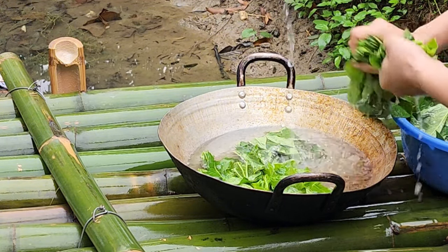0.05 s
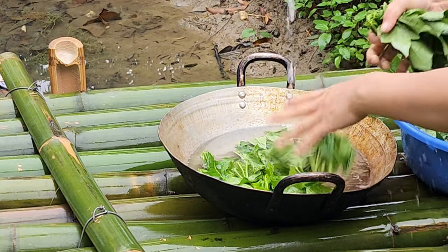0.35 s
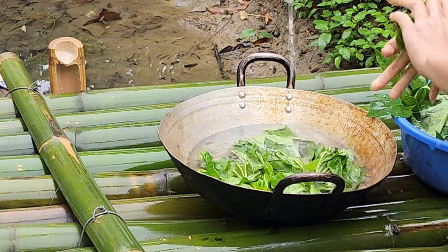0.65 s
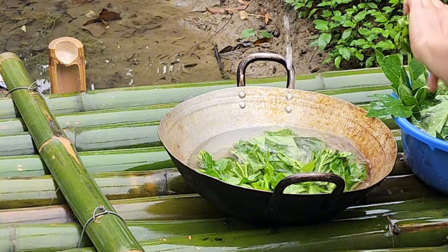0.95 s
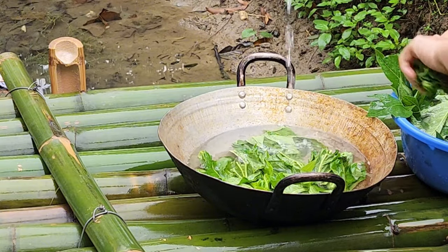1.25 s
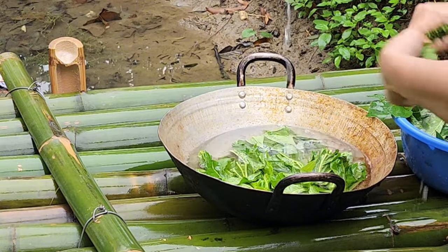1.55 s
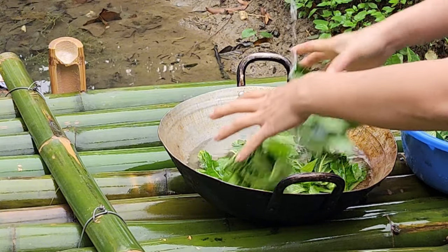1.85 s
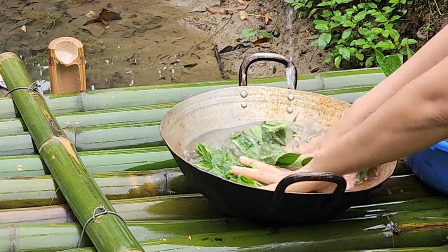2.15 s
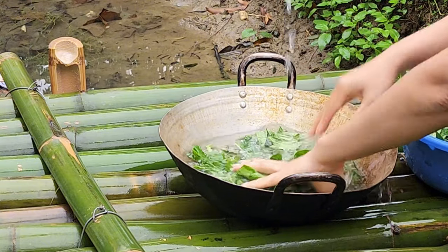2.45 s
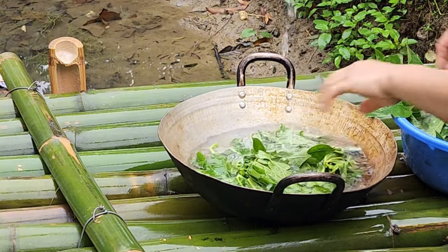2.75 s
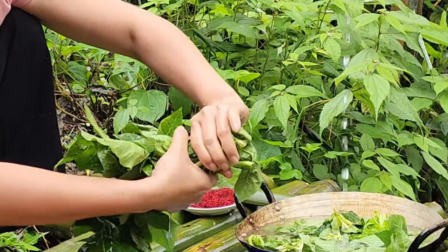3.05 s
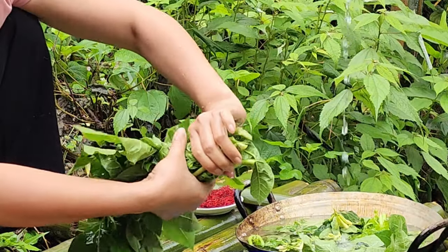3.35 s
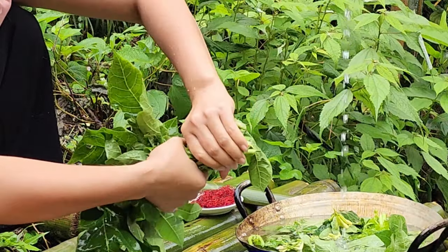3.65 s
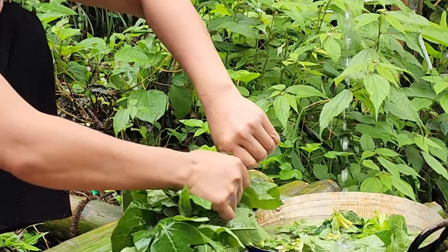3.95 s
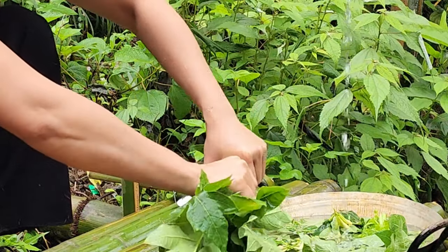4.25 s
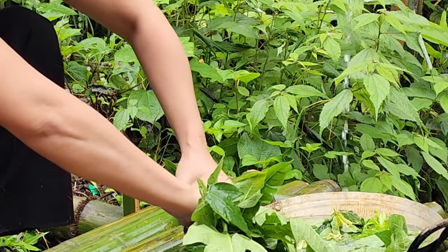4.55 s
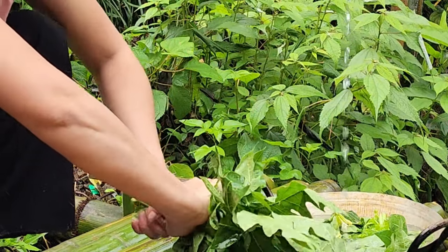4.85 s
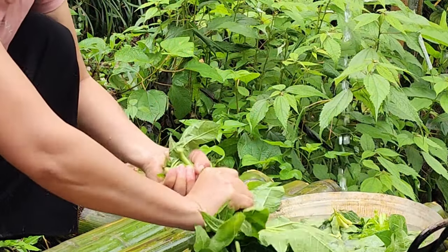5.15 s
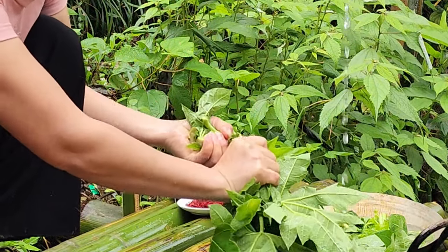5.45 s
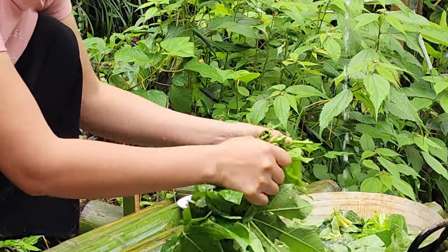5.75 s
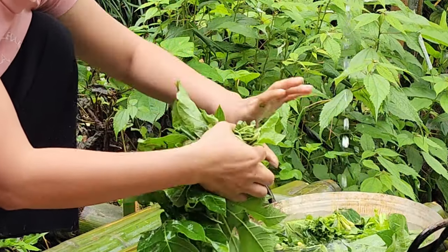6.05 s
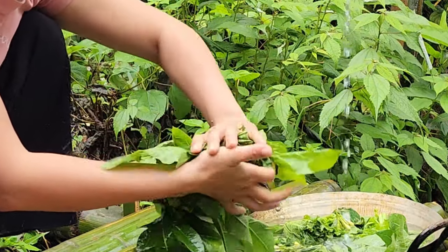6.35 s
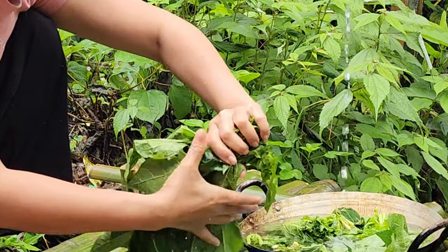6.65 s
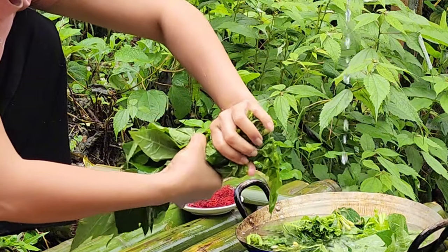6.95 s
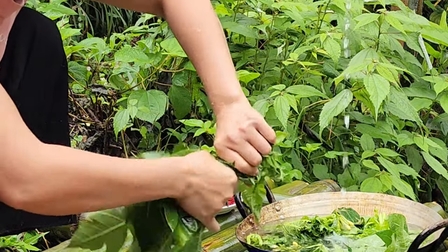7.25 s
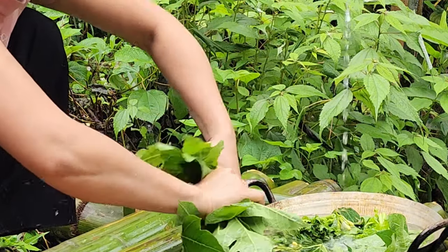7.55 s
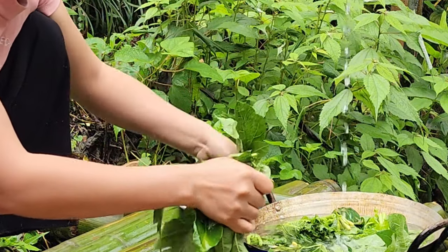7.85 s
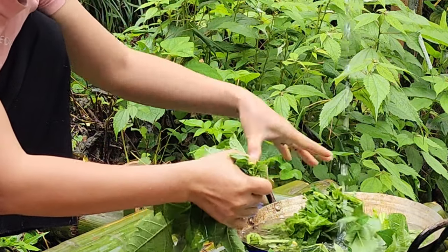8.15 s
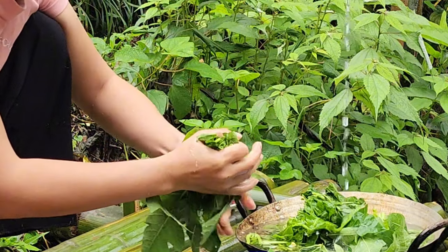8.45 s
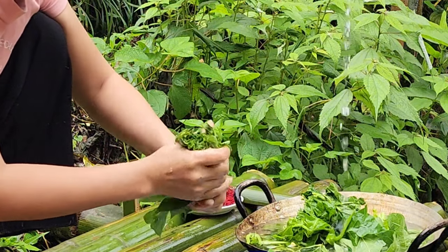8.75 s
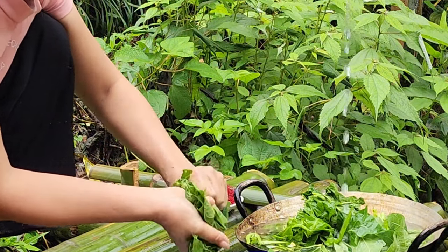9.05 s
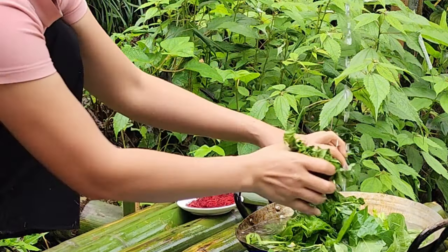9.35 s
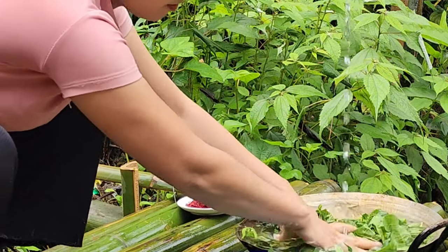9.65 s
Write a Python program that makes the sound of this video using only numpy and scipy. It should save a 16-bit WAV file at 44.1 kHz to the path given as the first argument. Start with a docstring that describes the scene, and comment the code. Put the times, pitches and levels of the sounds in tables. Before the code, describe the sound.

Greens are washed by hand outdoors, heard from close beside a wok of water. A steady trickle spatters, plops and bubbles, its gurgle muffled at times by hands and heaped leaves. Bursts of wet rustling and sharp stalk snaps follow, strongest around the middle and again near the end, with a few dull bumps. Far off, a bird repeats a thin whistled phrase over quiet open air.

```python
"""Washing greens in a wok

Outdoors, leafy greens are twisted apart by hand and pushed into a wok of water. A thin stream falls
from a spout: its drops spatter, and the air it traps plops and gurgles, except when hands or heaped
leaves muffle it. Wet leaves crackle, stalks snap, drips ring; a far bird whistles over a low rumble."""
import sys
import numpy as np
from scipy import signal
from scipy.fft import rfft, irfft
from scipy.io import wavfile
from scipy.ndimage import uniform_filter1d

SR = 44100
rng = np.random.default_rng(int(sys.argv[2]) if len(sys.argv) > 2 else 0)


def unload_wav(signal):
    """Save mono or channel-first audio to the path in sys.argv[1] as 16-bit WAV at rate SR, clipped to [-1, 1]."""
    wavfile.write(
        sys.argv[1],
        SR,
        np.round(np.clip(np.atleast_2d(signal).T, -1, 1) * 32767).astype(np.int16),
    )


N = 432180
TIME = np.arange(N) / SR

# The stream, muffled while hands or heaped leaves lie under it:
# t/s, relative gurgle level/dB, air pocket f/Hz, relative spray level/dB
STREAM_FLOW = [(0, -40.5, 590, -44), (.5, -52, 896.4, -45), (.95, -52.5, 842, -43.5),
               (1.5, -69, 839.3, -43), (1.82, -44.5, 748, -46), (1.93, -63, 839.4, -51),
               (2.94, -76, 789.4, -51), (3.02, -50, 576, -45), (4.4, -48.5, 567.9, -44.5),
               (5.75, -46.5, 573, -47), (7.3, -46.5, 558.9, -43), (8.08, -51.5, 541.8, -46),
               (8.11, -58, 564.8, -58), (9.58, -62.5, 567.5, -54), (9.8, -51, 565, -43)]


def stream(per_s=145, spread_db=4.8, level_db=-1.5, scatter=0.12):
    """Gurgling: each bead of falling water traps a ringing pocket of air of slightly different size."""
    # The tones of one pocket: multiple of its pitch, decay/s, relative level/dB
    pocket_tones = [(1.001, 0.0067, 10), (1.35, 0.003, -0.5), (2.35, 0.0052, 2.5)]
    db, hz, _ = curves(STREAM_FLOW)
    at, strength = random_hits(per_s, spread_db)
    gurgle = np.zeros((2, N))
    for multiple, decay_s, tone_db in pocket_tones:
        pitch = hz[at] * multiple * np.exp(rng.normal(0, scatter / multiple, len(at)))
        gain = strength * amp(tone_db + rng.normal(0, 3.0, len(at)))
        gurgle += rings(at, gain, pitch, np.full(len(at), decay_s), rise=0.025, size=900)
    return steadied(gurgle, 0.25) * amp(db + level_db)


def plops(decay=0.0038, attack=0.0026, glide_per_s=16, overtone_db=-13, splash_db=-7, level_db=-7):
    """A splash traps air that rings briefly and creeps up in pitch; small pockets plink and die sooner."""
    # Trapped air, from low gulps to high plinks: t/s, relative level/dB, f/Hz
    pockets = [(.208, -33, 601), (.242, -30, 720), (.299, -35, 3330), (.632, -43.5, 815),
               (.8183, -43, 3300), (.858, -40.5, 849), (1.0868, -27.5, 2350), (1.208, -29.5, 614),
               (1.657, -39, 994), (1.796, -35.5, 668), (2.2996, -33.5, 3346), (3.335, -39.5, 497),
               (3.515, -37.5, 569), (3.694, -35.5, 596), (3.749, -34.5, 559.3), (3.976, -37.5, 564.6),
               (4.207, -31.5, 577), (4.463, -32.5, 447.5), (4.841, -38, 1007), (5.024, -35, 590),
               (5.256, -38.5, 578.8), (5.443, -34.5, 566), (5.559, -40, 558), (6.204, -33, 475),
               (6.802, -39, 540), (7.01, -35.5, 534), (7.249, -35, 575), (7.295, -37, 560.6),
               (7.466, -33, 603), (7.935, -40, 552), (7.994, -40.5, 537)]
    out, t = np.zeros((2, N)), np.arange(2200) / SR
    for s, db, hz in pockets:
        phase = 2 * np.pi * hz * (t + glide_per_s * t * t / 2)
        age = t * (hz / 600) ** 0.65  # runs faster for higher notes
        fade = np.exp(-age / decay)
        tone = np.sin(phase) + amp(overtone_db) * np.sin(2.27 * phase) * fade
        ring = evened(tone * (1 - np.exp(-age / attack)) * fade)
        burst = noise_pair(len(t)) * np.exp(-age / 0.0032)
        splash = evened(colour(burst, [(hz / 2, -14), (hz, 0), (hz * 2, -4), (hz * 10, -18)]))
        add(out, s, amp(db + level_db) * (ring + amp(splash_db) * splash))
    return out


def crackle(db, treble_db, drop_share, clump_db=2.0, level_db=1.22, usual_treble_db=-7):
    """Spatter and rustle come in clumps as the hands grip and twist."""
    drift = uniform_filter1d(uniform_filter1d(rng.standard_normal(N), size=500), size=200)
    blend = np.sqrt(drop_share) * spatter(db) + np.sqrt(1 - drop_share) * rustle()
    wet = steadied(blend * amp(clump_db * evened(drift)), 0.16)
    wet = turn_treble(wet, treble_db - usual_treble_db, above_hz=7800)
    return wet * amp(db + level_db) * lean_right(0.7)


def spray_and_grips(spray_treble_db=-6, spray_drop_share=0.92, attack_s=0.015, release_s=0.025):
    """Spray and handled leaves add up; gives their joint level/dB, treble/dB and share of drops."""
    # Handfuls of leaves gripped, torn, squeezed or pressed under:
    # t/s, length/s, relative level/dB, relative treble/dB, share of drops (0-1)
    grips = [(.22, 0.14, -41, -15, 0.95), (0.931, 0.071, -43, -18.5, 0.79), (1.171, 0.14, -40.5, -24, 0.84),
             (1.32, 0.051, -35.5, -8.5, 0.54), (1.858, 0.048, -42.5, -17, 0.81),
             (2.07, 0.047, -44, -15, 0.69), (2.268, 0.27, -46, -12, 0.9), (2.55, 0.053, -46, -12, 0.6),
             (2.71, 0.076, -48, -3, 0.99), (3.08, 0.057, -45, -5, 0.5), (3.579, 0.57, -41.5, -15, 0.25),
             (3.8, 0.061, -38, -18, 0.25), (4.319, 0.061, -38, -13, 0.34), (4.451, 0.07, -40, -28, 0.3),
             (4.679, 0.051, -41, -26, 0.4), (4.859, 0.14, -37.5, -27, 0.27), (5.14, 0.035, -39, -28, 0.27),
             (5.47, 0.03, -41.5, -22, 0.44), (5.867, 0.046, -45, 1, 0.4), (6.44, 0.09, -47, -7, 0.3),
             (6.981, 0.15, -44, -18, 0.19), (7.158, 0.44, -36.5, -6.5, 0.22), (8.19, .32, -51, -8, .08),
             (8.285, .09, -48, -5, 0.15), (8.53, 0.27, -45.5, -9, 0.36), (8.818, .1, -43, -4.5, 0.31),
             (8.92, 0.076, -33.5, -7, 0.49), (9.231, 0.2, -48.5, -6, 0.8)]
    power = amp(curves(STREAM_FLOW)[2]) ** 2
    treble, drops = power * amp(spray_treble_db) ** 2, power * spray_drop_share
    for start, length, db, treble_db, share in grips:
        age = TIME - start
        fade_in = np.clip(age / attack_s, 0, 1)
        fade_out = np.exp(-np.clip(age - length, 0, 1) / release_s)
        grip = (amp(db) * fade_in * fade_out) ** 2
        power += grip
        treble += grip * amp(treble_db) ** 2
        drops += grip * share
    return 10 * np.log10(power), 10 * np.log10(treble / power), np.clip(drops / power, 0, 1)


def spatter(db, usual_per_s=380, spread_db=5.2, scatter=0.24, tick_s=0.00048, tick_db=-6):
    """Droplets and bursting films of water: each is a sharp tick and a quick cluster of short rings."""
    # The tone colour of drops on leaves: f/Hz, relative level/dB
    spectrum = [(150, -33), (250, -22), (452, -25), (576, 2), (1050, -3), (1330, -4), (1750, -10.5),
                (2250, -.5), (2700, -5), (3300, -2), (4490, -7.5), (5250, -4.5), (7440, -4.5), (9010, -9.5),
                (14900, -10), (16000, -10.5)]
    # a harder splash throws more drops, so they merge
    at, strength = random_hits(usual_per_s * amp(0.8 * (db - db.mean())), spread_db)
    centre_hz = np.exp(rng.uniform(np.log(900), np.log(15000), len(at)))
    ticks = evened(noise_pair(N) * np.sqrt(hit_power(at, strength, tick_s)))
    # the finest drops differ least in strength
    strength = strength ** np.minimum((6000 / centre_hz) ** 0.49, 1)
    ringing = np.zeros((2, N))
    for delay in np.linspace(0, 0.0024, num=4):
        hz = np.minimum(centre_hz * np.exp(rng.normal(0, scatter, len(at))), SR / 2)
        late = (delay * SR * rng.uniform(0, 2, len(at))).astype(int)
        gain = strength * (hz / 3000) ** 0.68 * np.exp(-delay / 0.005)
        ringing += rings(at + late, gain, hz, decay_s=0.0017 * (hz / 3000) ** -0.5, rise=0, size=300)
    return steadied(colour(evened(ringing) + amp(tick_db) * ticks, spectrum), 0.087)


def rustle(per_s=700, spread_db=4.0, break_s=0.0007, hiss=0.39):
    """Wet leaves rub and tear: a dense run of tiny breaks over a soft hiss."""
    # The tone colour of rubbing leaves: f/Hz, relative level/dB
    spectrum = [(150, -7.5), (430, -6.5), (580, 1), (900, -11), (1350, 2.5), (1700, -1), (2230, 7),
                (2700, -0.5), (3300, 4), (4000, -1), (4500, -0.5), (5300, 3), (9500, -4), (16000, -9)]
    at, strength = random_hits(per_s, spread_db)
    power = hit_power(at, strength, break_s)
    tearing = noise_pair(N) * np.sqrt(power / power.mean() + hiss)
    return steadied(colour(tearing, spectrum), 0.0096)


def snaps(lesser_snaps, crack_s=0.0023, crack_db=-4.5, crack_per_octave_db=8, level_db=-5):
    """A stalk gives way in an instant: thick ones pop for a few cycles, thin ones only crack."""
    # The loudest stalks snapping and hard drops smacking: t/s, relative level/dB, rough f/Hz
    loud_snaps = [(.0386, -28.5, 4200), (.1594, -29.5, 5500), (.2095, -32.5, 6017), (.35, -32, 2730),
                  (.546, -35.5, 3300), (.608, -39, 2300), (.7158, -34, 5450), (.8185, -37, 3396),
                  (.896, -39, 4460), (.992, -30.5, 5870), (1.087, -33, 2330), (1.178, -33.5, 3336),
                  (1.316, -29, 2150), (1.5339, -30, 3180), (1.5448, -28.5, 3553), (1.597, -30.5, 4950),
                  (1.631, -32.5, 4775), (1.8375, -34.5, 4194), (2.366, -39.5, 6500), (2.4425, -31.5, 5510),
                  (2.5185, -29.5, 9500), (2.579, -35.5, 2122), (2.773, -39.5, 2960), (2.8192, -34.5, 3520),
                  (2.8535, -34.5, 6712), (2.9776, -35, 4134), (3.629, -34, 6740), (4.2237, -30, 3288),
                  (4.291, -26, 2560), (4.3569, -26.5, 2483), (4.5192, -29, 3620), (4.7095, -28.5, 4234),
                  (4.868, -37.5, 4833), (4.963, -33.5, 3400), (4.9875, -23, 1693), (4.9902, -33.5, 1500),
                  (5.1342, -19.5, 2053), (5.1522, -29, 2936), (5.4728, -26, 2637), (5.4758, -28.5, 2503),
                  (5.764, -38, 3270), (5.902, -35.5, 4196), (6.091, -35, 7474), (6.4455, -35.5, 6444),
                  (6.5292, -29.5, 6600), (6.59, -38, 5005), (6.722, -34.5, 4078), (6.749, -31.5, 5650),
                  (6.8383, -33.5, 5777), (6.9955, -34.5, 7510), (7.1803, -28, 3433), (7.3694, -26, 4177),
                  (7.4185, -27, 4700), (7.4349, -28, 3208), (7.5755, -18, 3770), (7.848, -37.5, 3498),
                  (7.8975, -35.5, 6500), (8.045, -37.5, 3286), (8.348, -38.5, 5500), (8.5482, -34.5, 3403),
                  (8.826, -32, 5927), (8.9265, -25.5, 2500), (8.95, -38, 2182), (8.972, -35, 2000),
                  (8.9997, -28.5, 7030), (9.2258, -39, 2590), (9.233, -37, 7030)]
    out, t = np.zeros((2, N)), np.arange(880) / SR
    for s, db, hz in loud_snaps + lesser_snaps:
        pop = evened(np.sin(2 * np.pi * hz * 0.884 * t) * np.exp(-t * hz / 1.34))
        fibres = noise_pair(len(t)) * (np.exp(-t / crack_s) + 0.072 * np.exp(-t / 0.0031))
        spectrum = [(200, -24), (hz * 0.33, -10), (hz * 0.62, 0), (hz * 1.64, -3), (hz * 3, -17)]
        crack = evened(colour(fibres, spectrum)) * amp(crack_db + crack_per_octave_db * np.log2(hz / 2000))
        snap = evened((pop + crack) * (1 - np.exp(-t / 0.0002)))
        add(out, s, snap * amp(db + level_db) * lean_right(0.4))
    return out


def small_snaps(db, drop_share, most_per_s=18, above_db=2.5, spread_db=0.4, middle_hz=4600, scatter=0.4):
    """Picks lesser snaps at random, more where the leaves are wet: t/s, relative level/dB, rough f/Hz."""
    at = np.flatnonzero(rng.random(N) < most_per_s * drop_share / SR)
    strength, pitch = rng.standard_normal((len(at), 2)).T
    levels = db[at] + above_db + spread_db * strength
    return list(zip(at / SR, levels, middle_hz * np.exp(scatter * pitch)))


def bubbles(wobble=0.043, fade=1.5, fizz_db=-8, fizz_width_hz=450):
    """Each bubble wobbles and rises in pitch as it nears the surface, in a fizz of lesser ones."""
    # Rising bubbles: t/s, level/dB, first f/Hz, last f/Hz, length/s
    rising = [(0.15, -37.5, 506, 736, 0.02), (0.165, -35.5, 940, 1460, 0.022),
              (0.216, -35, 590, 768, 0.023), (.284, -34, 572, 1070, 0.0247),
              (.322, -38, 780.4, 1319, 0.021), (0.49, -34, 867, 1650, 0.028),
              (0.641, -42, 1190, 1750, .026), (0.953, -38, 1062, 1600, 0.022),
              (1.956, -35, 1470, 1960, 0.024), (2.055, -35.5, 1285, 1746, .024),
              (3.206, -32.5, 1258, 1500, 0.013), (4.468, -22, 513, 607, 0.016),
              (4.864, -28, 1105, 1510, .018), (5.609, -37, 1251, 1588, 0.015),
              (5.857, -34, 1147, 1498, .02), (6.899, -36.5, 1200, 1899, 0.019),
              (9.227, -31.5, 1480, 1862, 0.013), (9.262, -30.5, 1060, 1450, 0.014),
              (9.271, -42, 1700, 2380, 0.04), (9.535, -35.5, 3410, 3990, 0.017)]
    out = np.zeros((2, N))
    for s, db, first_hz, last_hz, length in rising:
        size = int(length * SR)
        shake = 1 + wobble * evened(uniform_filter1d(rng.standard_normal(size), size=50))
        hz = np.geomspace(first_hz, last_hz, size) * shake
        fizz = resonate(resonate(noise_pair(size), hz, fizz_width_hz), hz, fizz_width_hz)
        tone = np.sin(2 * np.pi * np.cumsum(hz) / SR) + amp(fizz_db) * evened(fizz)
        shape = np.exp(-fade * np.linspace(0, 1, size)) * signal.windows.tukey(size, 0.1)
        add(out, s, amp(db) * tone * shape)
    return out


def froth(per_s=70, spread_db=5.0, cycles=7, level_db=-9):
    """Small bubbles of many sizes chirp around the stream."""
    db = curves(STREAM_FLOW)[0]
    at, strength = random_hits(per_s, spread_db)
    hz = np.exp(rng.uniform(np.log(700), np.log(4500), len(at)))
    chirps = rings(at, strength * np.sqrt(hz), hz, decay_s=cycles / hz, rise=0.09, size=1300)
    return steadied(chirps, 0.3) * amp(db + level_db)


def drips(smack_s=0.00065, smack_db=-17):
    """A heavy bead smacks the water and sets the bowl ringing."""
    # Beads of the stream hitting open water: t/s, level/dB
    beads = [(3.021, -42.5), (3.238, -38), (3.374, -45), (3.524, -40.5), (3.693, -36.5), (3.832, -35.5),
             (3.978, -36), (4.044, -35.5), (5.443, -40), (5.887, -42), (6.008, -37.5), (6.3517, -40),
             (6.8029, -36), (7.109, -45), (7.616, -49)]
    out, t = np.zeros((2, N)), np.arange(880) / SR
    for s, db in beads:
        smack = noise_pair(len(t)) * np.exp(-t / smack_s)
        add(out, s, amp(db) * evened(wok(smack) + amp(smack_db) * smack))
    return out


def wok(x):
    """The air in the bowl gives a sound a hollow ring."""
    # The pitches at which that air rings: f/Hz, width/Hz, level/dB
    resonances = [(590, 87, -1.5), (1300, 67, 4), (2120, 140, 1.5), (3120, 140, -7.5), (5320, 580, -2)]
    return sum(amp(db) * signal.lfilter(*signal.iirpeak(hz, hz / width, SR), x)
               for hz, width, db in resonances)


def bumps(ring_s=0.0055):
    """Hands and greens bump the wok and the bamboo deck: dull knocks that die quickly."""
    # Knocks: t/s, level/dB, f/Hz
    knocks = [(0.038, -37.5, 129), (.99, -41, 188.8), (2.451, -43, 393.7), (4.965, -36.5, 172),
              (7.432, -33, 311.7)]
    out, t = np.zeros((2, N)), np.arange(4000) / SR
    for s, db, hz in knocks:
        phase = 2 * np.pi * hz * t
        add(out, s, amp(db) * (np.sin(phase) + 0.14 * np.sin(1.63 * phase)) * np.exp(-t / ring_s))
    return out


def echoes(x, near_s=0.004, far_s=0.04, far_db=-17):
    """Quick echoes off the wok and deck, and a faint tail from the bushes."""
    spectrum = [(100, -22.0), (600, -5.5), (2000, -4.5), (7000, -3.5), (16000, -9.0)]  # f/Hz, level/dB
    t, out = np.arange(9000) / SR, np.zeros((2, N))
    fade = (np.exp(-t / near_s) + amp(far_db) * np.exp(-t / far_s)) * (t > 0.0015)
    for offset in np.linspace(0, np.pi, num=4, endpoint=False):  # four echo patterns take turns
        tail = colour(noise_pair(len(t)) * fade, spectrum)
        weight = np.sin(2 * np.pi * TIME + offset) ** 2
        out += signal.oaconvolve(x * weight, tail / np.linalg.norm(tail[0]), axes=1)[:, :N]
    return out


def viewpoint(x, move_s=2.97, above_db=3, beside_db=-1.5):
    """The highest treble is brighter until 2.97 s and duller after it."""
    return turn_treble(x, np.where(TIME < move_s, above_db, beside_db), above_hz=9500)


def bird(waver=0.0174):
    """A far bird in the trees repeats a phrase of three thin, wavering whistles."""
    # The notes: t/s into the phrase, length/s, first f/Hz, last f/Hz, level/dB
    notes = [(0, .065, 4770, 4825, -43), (0.091, 0.07, 6400, 6810, -43.5), (0.134, .095, 6300, 5750, -46.5)]
    # The start of each phrase: t/s
    starts = [4.02, 4.29, 4.545, 4.805, 5.07]
    out = np.zeros((2, N))
    for start in starts:
        for s, length, first_hz, last_hz, db in notes:
            size = int(length * SR)
            shake = 1 + waver * evened(uniform_filter1d(rng.standard_normal((2, size)), size=80))
            hz = np.linspace(first_hz, last_hz, size) * shake
            tone = np.sin(2 * np.pi * np.cumsum(hz, axis=1) / SR)
            add(out, start + s, amp(db) * tone * signal.windows.tukey(size, 0.5))
    return out


def outdoors(air_db=-51, drone_hz=52, drone_width_hz=7):
    """The steady hush of open air, and a deep distant drone that swells and fades."""
    # The tone colour of the open air: f/Hz, relative level/dB
    spectrum = [(20, -13), (50, -7), (100, -4.5), (150, -10.5), (220, -17.5), (400, -19.5), (1400, -24),
                (3000, -14.5), (8000, -18.5), (16000, -31)]
    # The drone's swells: t/s, level/dB
    swells = [(0, -90), (4.3, -66), (4.75, -59), (5, -75), (5.3, -63), (5.7, -70), (6.7, -65), (7.4, -49),
              (7.7, -64), (8.25, -63.5), (8.45, -59), (9.3, -57.5), (9.8, -67)]
    hz = np.full(N, drone_hz)
    drone = resonate(resonate(rng.standard_normal((1, N)), hz, drone_width_hz), hz, drone_width_hz)
    air = amp(air_db) * evened(colour(noise_pair(N), spectrum))
    return air + steadied(drone, 0.085) * amp(curves(swells)[0])


def amp(db):
    """Turns decibels into a factor to multiply by."""
    return 10 ** (np.asarray(db) / 20)


def lean_right(db):
    """Factors that turn the left side down and the right side up by db."""
    return amp([[-db], [db]])


def evened(x):
    """Scales each channel to an average (rms) level of 1."""
    return x / np.sqrt(np.mean(x ** 2, axis=-1, keepdims=True) + 1e-20)


def steadied(x, seconds):
    """Holds the level near 1, leaving changes quicker than `seconds` alone."""
    size = max(int(seconds * SR), 2)
    power = uniform_filter1d(uniform_filter1d((x ** 2).mean(0), size), size)
    return x / np.sqrt(abs(power) + 1e-4 * power.mean())


def look_up(points, hz):
    """Reads a table of (f/Hz, value) at the given frequencies."""
    f, value = np.transpose(points)
    return np.interp(np.log(hz + 1), np.log(f + 1), value)


def curves(rows):
    """Turns each column after t/s into a curve with one value per sample."""
    s, *columns = np.transpose(rows)
    return [np.interp(TIME, s, c) for c in columns]


def add(mix, s, sound):
    """Mixes a sound in at time s."""
    part = mix[:, max(round(s * SR), 0):][:, :sound.shape[-1]]
    part += sound[..., :part.shape[1]]


def colour(x, spectrum):
    """Filters by a table of (f/Hz, level/dB) so that clicks keep their sharp start."""
    db = look_up(spectrum, abs(np.fft.fftfreq(4096, 1 / SR)))
    log_gain = np.log(amp(np.maximum(db, -100)))
    taps = np.fft.ifft(np.exp(np.conj(signal.hilbert(log_gain)))).real[:2048]
    return signal.oaconvolve(x, taps[None], axes=1)[:, :x.shape[1]]


def turn_treble(x, db, above_hz):
    """Turns the highest sounds up or down by db."""
    top = signal.sosfiltfilt(signal.butter(2, above_hz, "high", fs=SR, output="sos"), x)
    return x + top * (amp(db) - 1)


def resonate(x, hz, width_hz):
    """Keeps a narrow band of sound around the pitch curve hz."""
    turn = np.exp(2j * np.pi * np.cumsum(hz) / SR)
    keep = np.exp(-np.pi * width_hz / SR)
    return 2 * (turn * signal.lfilter([1 - keep], [1, -keep], x / turn + 1e-18)).real


def noise_pair(size):
    """White noise for left and right: alike in the bass, unrelated in the treble."""
    # How alike the two sides are: f/Hz, likeness (0-1)
    likeness = [(50, 0.92), (300, 0.71), (1000, 0.65), (3000, 0.44), (6000, 0.14), (12000, 0)]
    left, other = rfft(rng.standard_normal((2, size)))
    same = np.clip(look_up(likeness, np.fft.rfftfreq(size, 1 / SR)), -1, 1)
    right = same * left + np.sqrt(1 - same ** 2) * other
    return irfft(np.array([left, right]), size)


def random_hits(per_s, spread_db):
    """Random moments (in samples) and strengths: mostly weak, a few strong."""
    at = np.flatnonzero(rng.random(N) < per_s / SR)
    return at, amp(spread_db * np.minimum(rng.exponential(1, len(at)), 3.5))


def hit_power(at, strength, decay_s):
    """A power curve that jumps at each hit and then dies away."""
    return signal.lfilter([1], [1, -np.exp(-2 / (decay_s * SR))], np.bincount(at, strength ** 2, N))


def rings(at, gain, hz, decay_s, rise, size):
    """Fading tones with a soft start; rise is the share by which the pitch climbs per decay time."""
    t, hz = np.arange(size) / SR, hz[:, None]
    age = t / decay_s[:, None]
    phase = 2 * np.pi * hz * t * (1 + rise * age / 2)
    shape = gain[:, None] * np.exp(-age) * (1 - np.exp(-2 * t * hz)) * np.sqrt(1 - np.arange(size) / size)
    # short waves reach left and right out of step
    apart = rng.standard_normal(hz.shape) * hz / 9000
    where = (at[:, None] + np.arange(size)).ravel()
    return np.array([np.bincount(where, (shape * np.sin(phase + side * apart)).ravel(), N)[:N]
                     for side in (-1, 1)])


def scene(echo_db=-11.5, deepest_hz=340, snap_ring_db=-6):
    """Water and leaves close by, in the open air."""
    db, treble_db, drop_share = spray_and_grips()
    # shallow water holds no large air pockets, so the gurgle has no bass
    bass_cut = signal.butter(3, deepest_hz, "high", fs=SR, output="sos")
    gurgle = signal.sosfilt(bass_cut, stream() + plops())
    cracks = snaps(small_snaps(db, drop_share))
    leaves = crackle(db, treble_db, drop_share) + cracks + amp(snap_ring_db) * wok(cracks)
    near = leaves + gurgle + froth() + drips() + bubbles() + bumps()
    return viewpoint(near + amp(echo_db) * echoes(near)) + bird() + outdoors()


def record(dry, top_hz=16050):
    """Cuts away the very highest treble."""
    treble_cut = signal.firwin(401, top_hz, window=("kaiser", 8), fs=SR)
    return signal.oaconvolve(dry, treble_cut[None], "same")


dry = scene()
out = record(dry)
unload_wav(out)
```